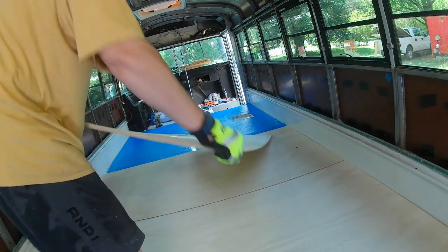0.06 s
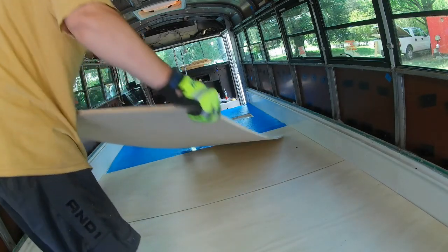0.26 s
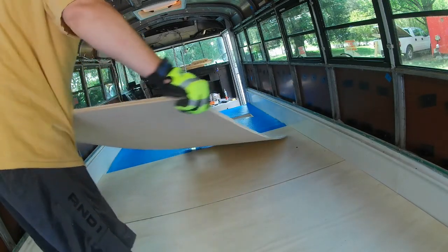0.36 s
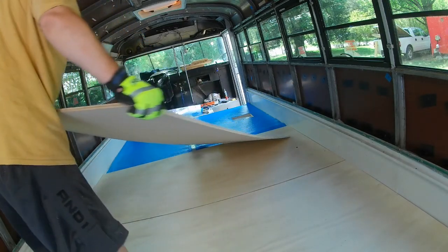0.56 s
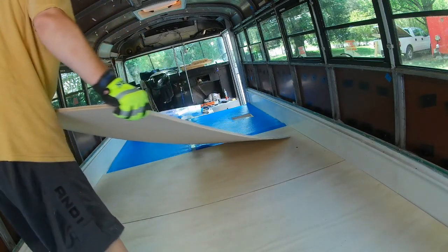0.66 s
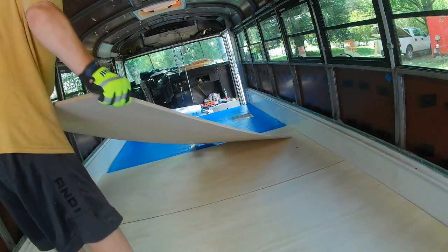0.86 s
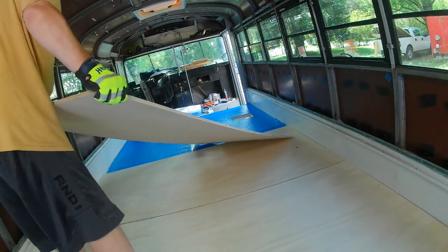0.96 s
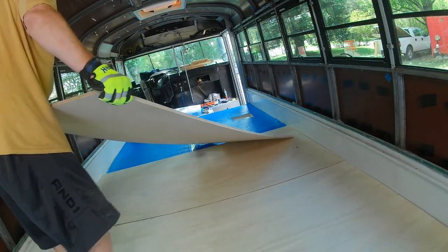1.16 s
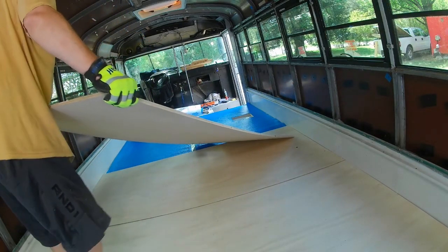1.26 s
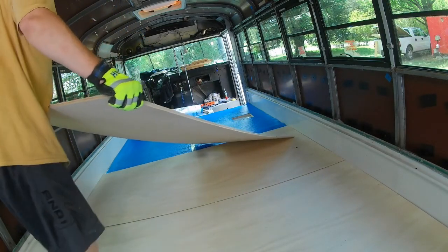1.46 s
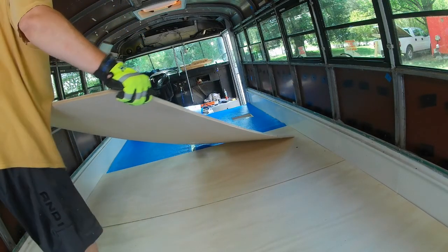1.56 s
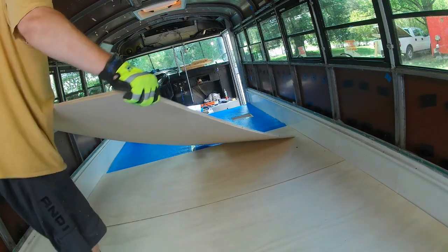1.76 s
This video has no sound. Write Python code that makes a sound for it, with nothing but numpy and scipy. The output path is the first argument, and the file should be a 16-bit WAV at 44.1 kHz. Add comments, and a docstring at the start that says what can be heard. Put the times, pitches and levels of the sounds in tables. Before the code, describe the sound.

A thin plywood sheet scrapes, flops down with a woody clatter, then rubs softly along plywood

```python
"""Over a faint outdoor hush, a thin, bent plywood sheet rubs along a plywood floor in uneven strokes.
One hard scrape ends with the sheet flopping down in a quick clatter that rings the wood and booms the floor.
Friction is noise made of dense tiny clicks; contacts are short pushes that excite damped modes.
Low thuds are decaying sines, and the shell of a stripped bus adds a short, diffuse echo to the wood."""
import sys
import numpy as np
from scipy import signal
from scipy.fft import rfft, irfft
from scipy.io import wavfile
from scipy.ndimage import uniform_filter1d

SR = 44100
rng = np.random.default_rng(int(sys.argv[2]) if len(sys.argv) > 2 else 0)


def output_pcm(signal):
    """Save a mono or channel-first signal as 16-bit PCM at the path in sys.argv[1].

    Samples are clipped to [-1, 1] before scaling.
    """
    pcm = np.clip(np.atleast_2d(signal).T, -1, 1) * 32767
    wavfile.write(sys.argv[1], SR, np.round(pcm).astype(np.int16))


N = 79380  # samples, 1.8 s

# strongest modes of the sheet: f/Hz, relative level/dB, t60/s
SHEET = [(233.3, 1.5, 0.29), (304, -5.5, 0.48), (353, 2.5, 0.2), (414, -1.5, 0.29), (476.3, 2, 0.26),
         (563, 2.5, 0.2), (617, 0, 0.2), (692, 3.5, 0.27), (750, 1.5, 0.29), (841, -1, 0.45),
         (1046, 2, 0.25), (1123, 7.5, 0.31), (1456, -12, 0.19), (1636, -1, 0.2)]


def undb(db):
    """Amplitude ratio of a level in dB, by the definition of the decibel."""
    return 10 ** (np.asarray(db) / 20)


def unit(x):
    """Normalise to an rms value of 1."""
    return x / np.sqrt(np.mean(x ** 2))


def lookup(hz, table):
    """Linear interpolation of a table along a log-frequency axis."""
    f, v = np.array(table, float).T
    return np.interp(np.log(np.maximum(hz, 1)), np.log(f), v)


def convolve(x, response):
    """Linear superposition: each sample of x launches a scaled copy of the response."""
    return signal.fftconvolve(x, response)[:N]


def colour(x, table):
    """Minimum-phase filtering by a folded cepstrum; the power of white noise is kept."""
    size = 8192
    gain = unit(undb(lookup(np.fft.rfftfreq(size, 1 / SR), table)))
    cepstrum = irfft(np.log(gain))
    # folding the negative times onto the positive ones makes the filter causal
    cepstrum[1:size // 2] *= 2
    cepstrum[size // 2 + 1:] = 0
    response = irfft(np.exp(rfft(cepstrum)))
    return convolve(x, response)


def decay(t, t60):
    """Exponential damping: the amplitude falls by 60 dB in t60 seconds."""
    return np.exp(-np.log(1000) * t / t60)


def walk(rate):
    """Band-limited random fluctuation of rms 1: held random values, smoothed over one hold."""
    hold = int(SR / rate)
    steps = np.repeat(rng.standard_normal(N)[:N // hold + 1], hold)
    return unit(uniform_filter1d(steps, hold)[:N])


def dense_ring(t60s):
    """High modal density: modes overlap into unit-energy noise whose octave bands decay separately."""
    t, hz = np.arange(N) / SR, np.fft.rfftfreq(N, 1 / SR)
    lowest_hz = 60
    octave = np.log2(np.clip(hz, lowest_hz, 15360) / lowest_hz)
    noise = rfft(rng.standard_normal(N))
    ring = 0
    for k in range(9):
        t60 = lookup(lowest_hz * 2 ** k, t60s)
        # neighbouring bands crossfade as triangles
        band = irfft(noise * np.maximum(1 - abs(octave - k), 0), N)
        ring = ring + band * unit(decay(t, t60))
    return unit(ring) / np.sqrt(N)


def sheet_modes():
    """Modal superposition: damped sines whose random signs stand for where the sheet is touched."""
    t = np.arange(N // 2) / SR
    signs = rng.choice([-1, 1], len(SHEET))
    ring = 0
    for sign, (hz, db, t60) in zip(signs, SHEET):
        ring = ring + sign * undb(db) * np.sin(2 * np.pi * hz * t) * decay(t, t60)
    return ring


def hush():
    """Stationary broadband noise: faint, steady outdoor sound inside the bus."""
    # spectrum of the hush: f/Hz, relative density/dB
    hush_spectrum = [(25, -48), (60, -17), (130, -7.5), (250, -1), (500, 0), (950, 0), (1600, -3),
                     (3000, -4), (6000, -7.5), (9000, -10), (12000, -14.5), (16000, -15.5)]
    return undb(-59.5) * colour(rng.standard_normal(N), hush_spectrum)


def grains():
    """Stick-slip friction: wood fibres catch and slip in dense tiny clicks of uneven size."""
    grains_per_s, spread_db = 14000, 4
    caught = rng.random(N) < grains_per_s / SR
    return unit(caught * rng.standard_normal(N) * undb(spread_db * rng.random(N)))


def sliding():
    """Friction-driven vibration: the edge rubs and rings the sheet, the face hisses, the body rasps."""
    # strokes: start t/s, end t/s, rise/s, fall/s (time constant of amplitude),
    # edge rub level/dB, face hiss level/dB, woody body level/dB
    strokes = [(-0.05, 0.197, 0.036, 0.13, -54.5, -56, -67), (0.2, 0.259, 0.06, 0.059, -39, -46.5, -42.5),
               (0.292, 0.379, 0.036, 0.057, -46, -51, -45.5), (0.434, 0.51, 0.04, 0.14, -55, -58.5, -64),
               (0.539, 0.651, 0.091, 0.081, -58, -62.5, -70),
               (0.749, 0.959, 0.14, 0.075, -50.5, -56, -60.5), (0.999, 1.062, 0.036, 0.023, -57, -53, -73),
               (1.141, 1.237, 0.044, 0.042, -52.5, -50, -57),
               (1.276, 1.31, 0.026, 0.049, -59.5, -81, -63.5), (1.435, 1.73, 0.16, 0.14, -57.5, -61.5, -67),
               (1.713, 1.82, 0.083, 0.05, -52.5, -59, -58)]
    # spectra of edge rub, face hiss and woody body: f/Hz, relative density/dB
    rub_spectrum = [(60, -30), (140, -10.5), (250, -11.5), (400, -2), (500, -4.5), (650, 0), (900, -5.5),
                    (1700, -0.5), (2200, 0), (3300, 3), (4400, -1.5), (6500, -8), (9000, -20),
                    (12000, -37.5)]
    hiss_spectrum = [(300, -24), (700, -4.5), (2500, -17), (4500, -7), (6200, -4), (8400, -1), (9600, -6.5),
                     (11000, -16.5), (13000, -26), (16000, -27)]
    body_spectrum = [(150, -21), (380, -16), (540, -15.5), (680, -1.5), (830, -2.5), (1020, 0),
                     (1220, -1.5), (1470, 0.5), (1950, -7), (4000, -20), (10000, -47)]
    judder_db, judder_per_s, ring_db = 0.63, 49, -19

    t = np.arange(N) / SR
    power = 0
    for start, end, rise, fall, rub_db, hiss_db, body_db in strokes:
        swell = np.clip((t - start) / rise, 0, 1)
        shape = swell * np.exp(-np.maximum(t - end, 0) / fall)
        # overlapping strokes add as powers
        power = power + np.outer(undb([rub_db, hiss_db, body_db]) ** 2, shape ** 2)
    judder = undb(judder_db * walk(judder_per_s))
    edge, face, body = (grains() * np.sqrt(p) * judder for p in power)
    ring = sheet_modes()
    ringing = undb(ring_db) * convolve(edge, ring / np.linalg.norm(ring))
    rub = colour(edge, rub_spectrum)
    hiss = colour(face, hiss_spectrum)
    rasp = colour(body, body_spectrum)
    return rub + ringing + hiss + rasp


def flop():
    """Impact excitation: each contact is a short push, a crack, a dense ring and the main modes."""
    # contacts as the sheet lands bit by bit: t/s, relative level/dB, low-pass cutoff f/Hz
    contacts = [(0.207, -16.5, 700), (0.234, -13, 2200), (0.2605, -10, 3500), (0.2732, 3, 1480),
                (0.2835, 0, 2470), (0.2885, 1, 2740), (0.2945, -5.5, 2400), (0.2985, 0.5, 2420),
                (0.307, -5.5, 1690), (0.316, -7, 1400), (0.336, -8, 1980), (0.369, -17.5, 1830),
                (0.385, -18.5, 2000), (0.40, -20.5, 2180), (0.48, -32, 1800)]
    # spectrum of a contact: f/Hz, relative density/dB
    slap_spectrum = [(25, -72), (45, -48), (80, -34), (120, -22), (160, -26), (188, -5), (290, 2),
                     (450, -1), (610, 3), (900, -2.5), (1100, 3), (1400, -2), (1600, 1), (2100, -4),
                     (3000, -4.5), (3900, -16.5), (8000, -20), (10000, -18), (13000, -31)]
    # decay of its dense ring: f/Hz, t60/s
    slap_t60 = [(60, 0.54), (190, 0.2), (400, 0.25), (1000, 0.22), (3000, 0.23), (10000, 0.2)]
    slap_db, crack_db, modes_db = -1, -16, -47.5

    slap, modes = np.zeros(N), np.zeros(N)
    for at, db, bright_hz in contacts:
        push = np.zeros(N)
        push[int(at * SR)] = undb(db)
        # a lower cutoff makes a longer, duller push
        push = signal.sosfilt(signal.butter(1, bright_hz, fs=SR, output="sos"), push)
        slap += undb(crack_db) * push + convolve(push, dense_ring(slap_t60))
        modes += convolve(push, sheet_modes())
    return undb(slap_db) * colour(slap, slap_spectrum) + undb(modes_db) * modes


def thuds():
    """Damped low modes of flexing sheet and floor; pitch may glide, rising as bending tightens the sheet."""
    # thuds: t/s, initial f/Hz, glide/(Hz/s), relative level/dB, rise time constant/s, t60/s
    low_modes = [(0.268, 200.7, 378, -33.5, 0.012, 0.4), (0.279, 76.4, -2.5, -53.5, 0.054, 0.61),
                 (1.069, 116, 0, -59.5, 0.026, 0.18)]
    out = 0
    for at, hz, glide, db, rise, t60 in low_modes:
        age = np.maximum(np.arange(N) / SR - at, 0)
        # cycles are the time integral of the gliding frequency
        cycles = hz * age + glide * age ** 2 / 2
        envelope = (1 - np.exp(-age / rise)) * decay(age, t60)
        out = out + undb(db) * np.sin(2 * np.pi * cycles) * envelope
    return out


def bus_echo(wood):
    """Diffuse reverberation: the bus shell returns the wood's sound as a dense decaying ring."""
    # reverberation of the bus: f/Hz, t60/s
    bus_t60 = [(100, 0.57), (1000, 0.35), (4000, 0.6), (12000, 0.26)]
    return undb(-10) * convolve(wood, dense_ring(bus_t60))


def scene():
    """Superposition of wood, bus echo, thuds and hush, identical in both channels."""
    wood = sliding() + flop()
    mono = wood + bus_echo(wood) + thuds() + hush()
    return np.array([mono, mono])


def record(dry):
    """Band limitation: a steep elliptic low-pass removes the treble above 15.8 kHz."""
    low_pass = signal.ellip(10, .2, 70, 15800, fs=SR, output="sos")  # 0.2 dB ripple, 70 dB stop band
    return signal.sosfilt(low_pass, dry)


dry = scene()
out = record(dry)
output_pcm(out)
```